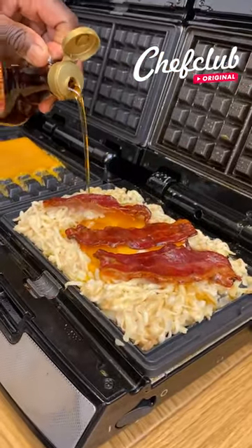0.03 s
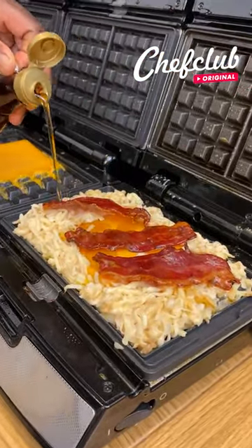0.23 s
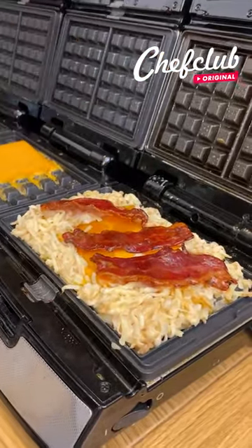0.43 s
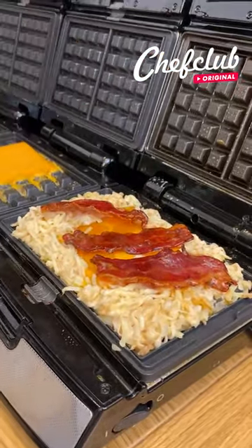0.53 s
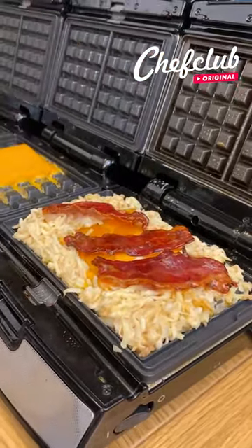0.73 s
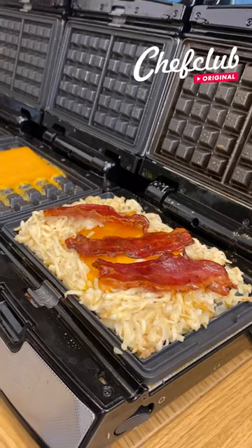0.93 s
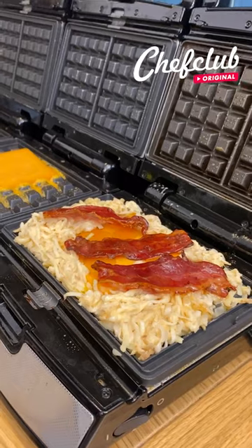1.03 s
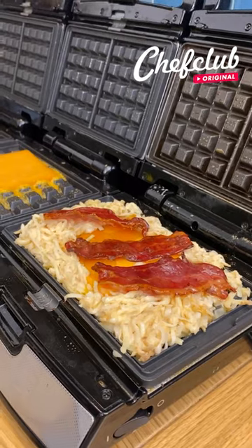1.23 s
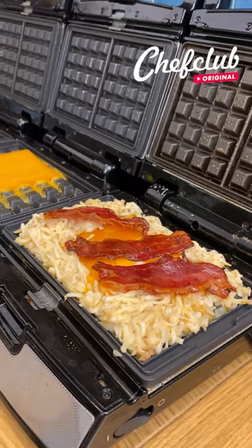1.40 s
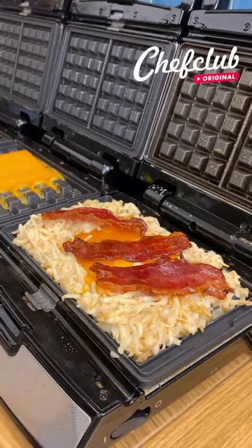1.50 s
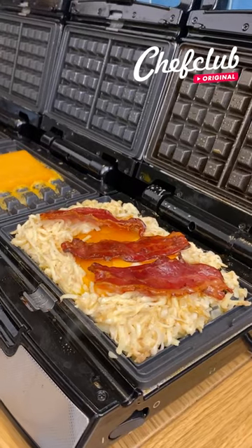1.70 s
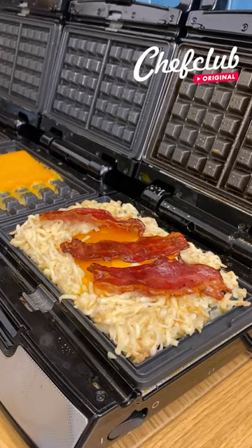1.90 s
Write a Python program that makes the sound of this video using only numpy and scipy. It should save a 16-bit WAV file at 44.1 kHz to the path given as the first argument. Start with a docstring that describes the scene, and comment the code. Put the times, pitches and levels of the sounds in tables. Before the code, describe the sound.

Clicks and a metal ring, then a thump and short slide on wood, over faint sizzling.

```python
"""A kitchen worktop beside a hot waffle iron. A bottle is handled among utensils: light clicks,
a clatter and one bright metal ring, choked by a touch. Something heavy thumps onto the wooden counter
and slides for half a second, its tiny slips shaking the wood, with soft bumps before and after.
Under it all lies a bed of hiss and faintly sizzling fat, heard through two close microphone ports."""
import sys
import numpy as np
from scipy import signal
from scipy.fft import rfft, irfft
from scipy.io import wavfile
from scipy.ndimage import uniform_filter1d

SR = 44100
rng = np.random.default_rng(int(sys.argv[2]) if len(sys.argv) > 2 else 0)


def wrap_up_sound(samples):
    """Save the sound to the file named by the first command line argument, as 16-bit audio."""
    columns = np.atleast_2d(samples).T
    # keep every value between -1 and 1, then stretch to whole-number steps
    tamed = np.clip(columns, -1, 1)
    steps = np.round(tamed * 32767).astype(np.int16)
    wavfile.write(sys.argv[1], SR, steps)


N = 85995

# The bottle knocking among utensils. Each row: start in seconds, level in dB,
# treble tilt in dB per octave, clack pitch in Hz, clack level in dB relative to the crack.
CLICK_HITS = [(0.001, -12, 0.5, 2930, -12), (0.1095, -11.5, -2.5, 3030, 0), (0.127, -15.5, -2, 1400, 4.5),
              (0.199, -5, 1, 5740, -15), (0.204, -1.7, 0.6, 3424, -3.5), (0.217, -3, 0, 2270, -3.5),
              (0.249, -7, -3, 3000, 1), (0.273, -5.5, 1, 2905, -4), (0.278, -3.5, -2, 3070, -5),
              (0.284, -2, 2, 5870, -5), (0.316, -9.5, -3, 2383, 0.5), (0.352, -18, -1, 1840, -15),
              (0.416, -10.5, -4, 2000, 2.5), (0.434, -6, 3, 2430, -4), (0.459, -14.5, -6, 1874, -2),
              (0.5261, -7, 3.5, 1947, -3.5)]
# The tone of the crack. Each row: frequency in Hz, gain in dB.
CRACK_EQ = [(100, -20), (260, 4.5), (380, -7.5), (650, -11.5), (870, -2.5), (1500, -1), (2200, -3.5),
            (3100, -0.5), (4000, -6), (7200, -5.5), (10000, -9), (15500, -20)]
# Hits that set the utensil ringing. Each row: start in seconds, level in dB.
METAL_STRIKES = [(0.11, -27), (0.205, -31), (0.2826, -0.5)]
# The utensil's modes. Each entry: pitch in Hz.
METAL_PITCHES = [1827, 2137, 2988, 3024, 3261, 3387, 3531, 4575, 4640, 5599, 5732, 5826, 7041, 10660, 11611,
                 12161, 13240]
# The same modes in order. Each row: level in dB, 60 dB decay in seconds, left over right in dB.
METAL_MODES = [(-10, 0.18, 0), (-13, 0.38, 0), (-17, 0.5, -12), (-13, 0.31, -14), (0, 0.21, 2),
               (-12.5, 0.56, 0), (-11, 0.24, -2), (2, 0.41, -2.5), (-6.5, 0.31, 0), (-16, 0.22, 0),
               (-11.5, 0.43, 3), (-9.5, 0.36, -2), (-11, 0.36, 8), (-16, 0.28, 0), (-16, 0.27, 0),
               (-16, .19, 0), (-15, .23, 0)]

# Bumps, the big thump and the jolts of the slide. Each row: start in seconds, level in dB,
# centre of the push in Hz, its reach as a factor below and above the centre.
COUNTER_BLOWS = [(0.004, -14, 145, 1.18), (0.218, -15, 180, 1.37), (0.244, -9, 126, 1.56),
                 (0.29, -11.5, 116, 1.55), (0.332, -13, 137, 1.9), (0.425, -12.5, 168, 1.47),
                 (0.459, -13, 173, 1.55), (0.556, -22, 136, 1.57), (0.61, -19.5, 260, 1.3),
                 (0.6505, 1.5, 383, 1.48), (0.653, -12, 770, 1.27), (0.655, 3.3, 125, 1.42),
                 (0.659, -5, 1120, 1.28), (0.731, -7.5, 257, 1.76), (0.818, -6.5, 161, 1.5),
                 (0.831, -7, 393, 1.33), (0.869, -7, 336, 1.3), (0.897, -5.5, 250, 1.85),
                 (0.928, -8, 158, 1.34), (0.955, -14, 172, 1.8), (0.982, -6, 730, 1.16),
                 (1.012, -10, 287, 2.1), (1.023, -5, 1120, 1.14), (1.04, -9, 220, 2.2),
                 (1.074, -9.5, 266, 1.55), (1.095, -8.5, 150, 1.33), (1.122, -9.5, 160, 1.65),
                 (1.164, -8.5, 160, 1.26), (1.185, -11, 237, 2.14), (1.473, -13.5, 162.5, 1.18),
                 (1.641, -5.5, 129.3, 1.12), (1.65, -23, 374, 2.15)]
# The wooden counter's modes. Each row: pitch in Hz, level in dB, 60 dB decay in seconds.
COUNTER_MODES = [(114.5, -0.5, 0.045), (127.8, -1, 0.19), (167.5, 1, 0.11), (207, -9.5, 0.068),
                 (257.2, -6.5, 0.11), (310, -3.5, 0.12), (349.8, -6, 0.17), (446.8, 1, 0.056),
                 (491.7, -0.5, 0.13), (635, -11, 0.099), (718, -6, 0.16), (914, -7, 0.024),
                 (1032, -9, 0.053), (1179, -11.5, 0.06), (1490, -21.5, 0.11), (1790, -23.5, 0.11)]
# Faders for the slide and the faint shuffle after it. Each row: time in seconds, rumble in dB,
# scrape in dB.
SLIDE_FADERS = [(0.67, -25, -32), (0.7, -32.5, -41.5), (0.78, -31.5, -41.5), (0.82, -28, -38),
                (0.89, -29.5, -32.5), (0.95, -26.5, -31), (1.04, -30.5, -29), (1.09, -30, -35),
                (1.15, -31.5, -42.5), (1.2, -32.5, -42.5), (1.222, -40.5, -49.5), (1.35, -48, -53.5),
                (1.41, -48, -51.5), (1.95, -55.5, -59.5)]
# Short slips push little bass into the wood. Each row: frequency in Hz, gain in dB.
SLIP_EQ = [(80, -11), (125, -9.5), (165, -3.5), (230, -4.5), (370, 2), (490, -3), (610, -2), (720, 2),
           (870, -2.5), (1100, 4), (1500, -2.5), (1800, -1)]
# The gritty edge of the scrape. Each row: frequency in Hz, gain in dB.
GRIT_EQ = [(300, -34), (700, -19), (1500, 3), (2100, -9), (3200, -7), (4500, -16.5), (9000, -29)]

# The thin, bright crackle of fat. Each row: frequency in Hz, gain in dB.
SIZZLE_EQ = [(500, -52), (2500, -3), (7000, 11), (15000, 1)]
# Sharper ticks in the sizzle. Each row: start in seconds, level in dB, pitch in Hz.
SIZZLE_TICKS = [(0.436, -25.5, 11500), (0.529, -22, 11600), (0.763, -24, 5460), (0.85, -23.5, 8700),
                (1.168, -25, 9200), (1.28, -24.5, 10200), (1.345, -27, 9200), (1.546, -29, 11000),
                (1.66, -27, 10000), (1.732, -23.5, 2740), (1.9088, -19.5, 6040)]
# The tone of the steady noise bed. Each row: frequency in Hz, gain in dB.
HISS_EQ = [(20, -48), (36, -50), (50, 4.5), (62, 6), (74, 2.5), (95, 2.5), (130, -0.5), (220, -4),
           (380, -15.5), (500, -6.5), (700, -12), (1500, -15), (2700, -20.5), (4200, -21.5), (8000, -22),
           (12000, -27.5), (15500, -30.5)]
# The fader of a swelling layer of hiss. Each row: time in seconds, level in dB.
SWELL_FADER = [(0, -45.5), (0.15, -53), (0.55, -48), (0.72, -54), (1.1, -55.5), (1.25, -47.5),
               (1.36, -46.5), (1.5, -49), (1.65, -57.5), (1.8, -53), (1.95, -58.5)]
# The tone of that layer. Each row: frequency in Hz, gain in dB.
SWELL_EQ = [(100, -12), (450, 2), (900, -9), (1500, -3.5), (2600, 4.5), (4000, -2.5), (5800, -5.5),
            (8000, -15), (15000, -16)]
# The kitchen's reverb. Each row: frequency in Hz, 60 dB decay in seconds.
ROOM_DECAY = [(100, 0.84), (500, 0.91), (1500, 0.34), (4000, 0.55), (9000, 0.21), (15000, 0.35)]

# How alike the two ports sound. Each row: frequency in Hz, likeness from 0 to 1.
PORT_LIKENESS = [(60, .999), (140, 1), (300, 0.95), (480, 0.88), (700, 0.43), (1400, 0.29), (2300, 0.69),
                 (3400, 0.59), (5000, 0.62), (7000, 1), (9000, 1), (10600, 1), (12600, 0.85), (14500, 0.91),
                 (15700, 1)]
# Phase between the ports. Each row: frequency in Hz, lead of the left in radians.
PORT_LEAD = [(20, 0), (2000, 0), (3400, .9), (4600, 1.05), (6200, .3), (7200, 1.5), (8300, 2.9),
             (9500, 3.4), (10500, 4.6), (11800, 6.1), (13400, 6.5), (14500, 7.9), (15600, 9.4)]
# Balance between the ports. Each row: frequency in Hz, left over right in dB.
PORT_BALANCE = [(200, -0.5), (350, 0.5), (490, -3.5), (700, 0.5), (1000, 0.5), (1300, 3.5), (1800, 0),
                (3400, 0.5), (4800, -0.5), (7000, 0), (15000, 0.5)]


def clatter(gain_db=-2, attack_s=0.00079, decay_s=0.0069, clack_t60_s=0.058, room_db=2.5):
    """Each knock of the bottle is a short crack with a room tail and a hollow, pitched clack."""
    out, t = np.zeros((2, N)), np.arange(SR // 2) / SR
    for start, db, tilt_db, clack_hz, clack_db in CLICK_HITS:
        crack = rng.standard_normal((2, len(t))) * (1 - np.exp(-t / attack_s)) * np.exp(-t / decay_s)
        click = unit_energy(crack) + amp(room_db) * room()
        hollow = np.sin(2 * np.pi * clack_hz * t) * amp(-60 * t / clack_t60_s)
        clack = amp(clack_db) * unit_energy(convolve(click, hollow))
        add(out, start, amp(gain_db + db) * (colour(click, CRACK_EQ, tilt_db) + clack))
    return out


def utensil(gain_db=-25.5, attack_s=0.0035, choke_at_s=0.417, choke_db_per_s=1800, room_db=-10):
    """Struck metal rings on, each mode with its own pan, until a touch chokes it."""
    out, t = np.zeros((2, N)), np.arange(SR // 2) / SR
    for start, strike_db in METAL_STRIKES:
        for hz, (db, t60, pan_db) in zip(METAL_PITCHES, METAL_MODES):
            envelope = amp(gain_db + strike_db + db - 60 * t / t60) * (1 - np.exp(-t / attack_s))
            mode = np.sin(2 * np.pi * hz * (t + start)) * envelope
            add(out, start, amp([[pan_db / 2], [-pan_db / 2]]) * mode)
    out *= amp(-choke_db_per_s * np.maximum(np.arange(N) / SR - choke_at_s, 0))
    return out + amp(room_db) * convolve(out, room())


def thumps(gain_db=-17, room_db=-10):
    """Padded blows ring the counter; the softer the contact, the lower and rounder the push."""
    out, ring = np.zeros((2, N)), counter_ring()
    for start, db, hz, reach in COUNTER_BLOWS:
        push = signal.butter(2, [hz / reach, hz * reach], "band", fs=SR, output="sos")
        add(out, start, amp(gain_db + db) * signal.sosfilt(push, ring))
    return out + amp(room_db) * convolve(out[0], room())


def counter_ring(decay_scale=1):
    """The wood's answer to a tap: neighbouring modes swing in opposite directions."""
    t = np.arange(SR // 2) / SR
    swing = sum((-1) ** k * amp(db - 60 * t / (t60 * decay_scale)) * np.exp(2j * np.pi * hz * t)
                for k, (hz, db, t60) in enumerate(COUNTER_MODES))
    return np.array([swing.imag, swing.real])


def slide(crossover_hz=568, grit_db=-17, attack_s=0.0082, width_db=-0.5):
    """Dense small slips shake the counter: an even rumble, and a scrape that peaks in mid-stroke."""
    slips = crackle(per_s=1000, spread_db=1.5)
    loaded_ring = counter_ring(decay_scale=0.9)[0]  # the sliding weight damps the wood
    body = colour(convolve(slips, loaded_ring), SLIP_EQ)
    crossover = [signal.butter(6, crossover_hz, kind, fs=SR, output="sos") for kind in ("low", "high")]
    rumble, scrape = (unit_rms(signal.sosfilt(band, body)) for band in crossover)
    scrape += amp(grit_db) * unit_rms(colour(slips, GRIT_EQ))
    rumble = steady(rumble) * fader(SLIDE_FADERS, column=1)
    scrape = steady(scrape) * fader(SLIDE_FADERS, column=2)
    fade_in = np.clip((np.arange(N) / SR - SLIDE_FADERS[0][0]) / attack_s, 0, 1)
    return fade_in * (rumble + scrape) * amp([[0], [width_db]])


def sizzle(crackle_db=-62, tick_decay_s=0.0025, room_db=-5):
    """Fat crackles faintly on the hot plate, with a few sharper ticks."""
    out = amp(crackle_db) * unit_rms(colour(crackle(per_s=220, spread_db=1.2), SIZZLE_EQ))
    t = np.arange(SR // 20) / SR
    for start, db, hz in SIZZLE_TICKS:
        burst = rng.standard_normal((2, len(t))) * np.exp(-t / tick_decay_s)
        tick = colour(burst, [(hz / 4, -20), (hz, 0), (hz * 2, -16)])
        add(out, start, amp(db) * unit_energy(tick))
    return out + amp(room_db) * convolve(out[0], room())


def hiss(bed_db=-43, drift_db=1.76, size=512):
    """A steady bed of kitchen noise with slow swells and faint patches drifting through its tone."""
    bed = amp(bed_db) * unit_rms(colour(rng.standard_normal((2, N)), HISS_EQ, size=16384))
    swell = fader(SWELL_FADER) * unit_rms(colour(rng.standard_normal((2, N)), SWELL_EQ))
    bands = signal.stft(bed + swell, nperseg=size)[2]
    patches = uniform_filter1d(rng.standard_normal(bands.shape[1:]), size=9, axis=0)  # smooth in pitch
    patches = unit_rms(uniform_filter1d(patches, size=8, axis=1))  # and in time
    return signal.istft(bands * amp(drift_db * patches), nperseg=size)[1][:, :N]


def room(size=256):
    """A diffuse kitchen tail, each band dying at its own speed."""
    hz, t, bands = signal.stft(rng.standard_normal((2, SR // 2)), SR, nperseg=size)
    decay = amp(-60 * t / curve_at(ROOM_DECAY, hz)[:, None]) * (t > 0)
    return unit_energy(signal.istft(bands * decay, SR, nperseg=size)[1][:, :SR // 2])


def crackle(per_s, spread_db):
    """Two trains of random clicks of uneven size."""
    sizes = amp(spread_db * np.minimum(rng.exponential(1, (2, N)), 2.5))
    signs = rng.choice([-1, 1], (2, N))
    return sizes * signs * (rng.random((2, N)) < per_s / SR)


def colour(x, eq, tilt_db=0, size=4096):
    """A minimum-phase EQ of unit energy, tilted by tilt_db per octave above 1 kHz."""
    hz = abs(np.fft.fftfreq(size, 1 / SR))
    octaves = np.log2(np.maximum(hz, 1000) / 1000)
    log_gain = np.log(amp(curve_at(eq, hz) + tilt_db * octaves))
    taps = np.fft.ifft(np.exp(np.conj(signal.hilbert(log_gain)))).real[:size // 2]
    return convolve(x, taps / np.linalg.norm(taps))


def steady(x, size=2600):
    """Rides out slow swells of power, as under a constant push."""
    return x / np.sqrt(abs(uniform_filter1d(x ** 2, size, axis=1)) + 1e-9)


def amp(db):
    """Decibels to gain."""
    return 10 ** (np.asarray(db) / 20)


def unit_rms(x):
    """Scales to rms 1."""
    return x / np.sqrt(np.mean(x ** 2) + 1e-20)


def unit_energy(pair):
    """Scales a pair so that its first channel has energy 1."""
    return pair / np.linalg.norm(pair[0])


def curve_at(points, hz):
    """Reads a curve on a log-frequency axis."""
    point_hz, values = np.transpose(points)
    return np.interp(np.log(hz + 1), np.log(point_hz + 1), values)


def fader(table, column=1):
    """Gain over time from a column in dB."""
    rows = np.array(table)
    return amp(np.interp(np.arange(N) / SR, rows[:, 0], rows[:, column]))


def add(mix, start_s, sound):
    """Drops a sound into the mix at its cue."""
    part = mix[..., round(start_s * SR):][..., :sound.shape[-1]]
    part += sound[..., :part.shape[-1]]


def convolve(x, response):
    """Plays x through a response, channel by channel."""
    return signal.fftconvolve(np.atleast_2d(x), np.atleast_2d(response), axes=1)[:, :x.shape[-1]]


def scene():
    """The layers' two channels become mid and side, blended by frequency; the panned metal sits on top."""
    common, differing = rfft(clatter() + thumps() + slide() + hiss() + sizzle(), 2 * N)
    alike = np.clip(curve_at(PORT_LIKENESS, np.fft.rfftfreq(2 * N, 1 / SR)), 0, .9995)
    mid = common * np.sqrt((1 + alike) / 2)
    side = differing * np.sqrt((1 - alike) / 2)
    return irfft(np.array([mid + side, mid - side]))[:, :N] + utensil()


def record(dry, high_cut_hz=15800):
    """The ports differ a little in tone and drift apart in phase toward the treble; then a high cut."""
    hz = np.fft.rfftfreq(2 * N, 1 / SR)
    lean = np.exp(.5j * curve_at(PORT_LEAD, hz)) * amp(curve_at(PORT_BALANCE, hz) / 2)
    ports = irfft(rfft(dry, 2 * N) * np.array([lean, 1 / lean]))[:, :N]
    high_cut = signal.firwin(511, high_cut_hz, window=("kaiser", 9), fs=SR)
    return signal.oaconvolve(ports, high_cut[None], "same")


dry = scene()
out = record(dry)
wrap_up_sound(out)
```